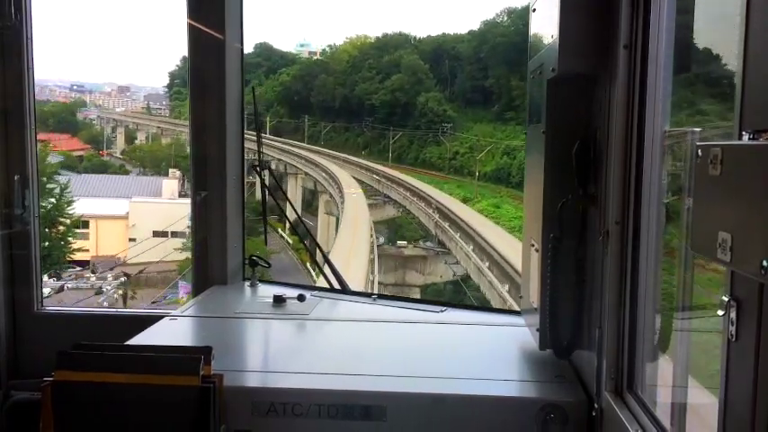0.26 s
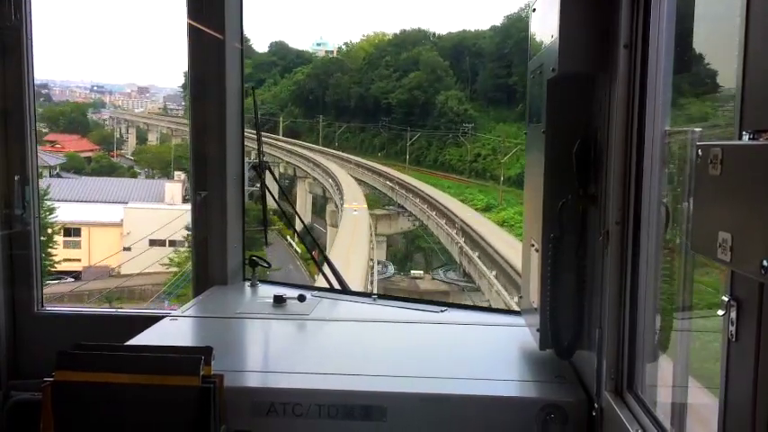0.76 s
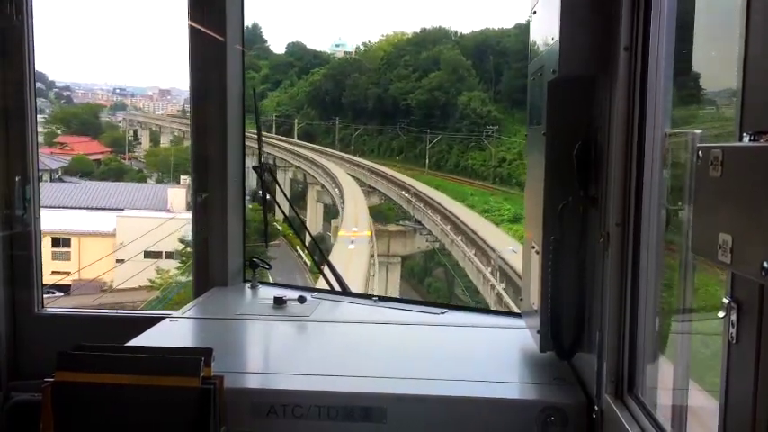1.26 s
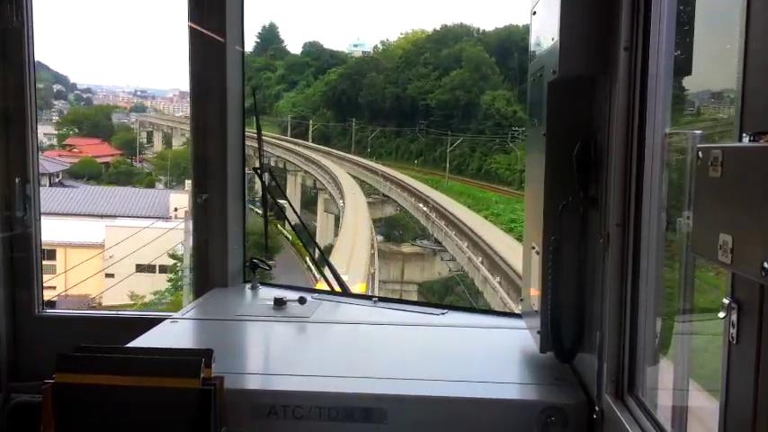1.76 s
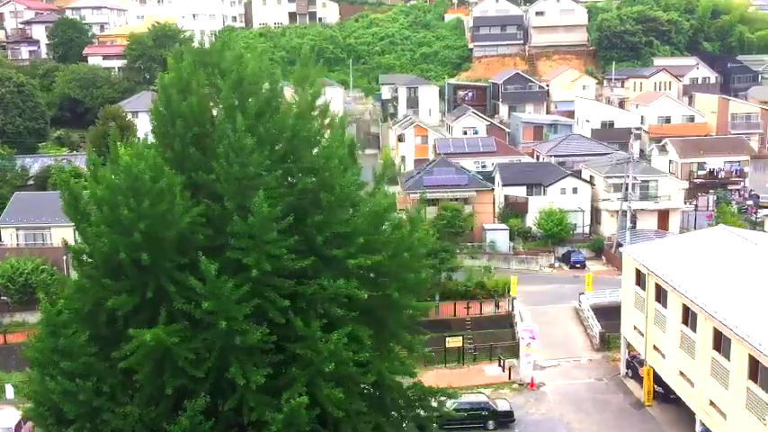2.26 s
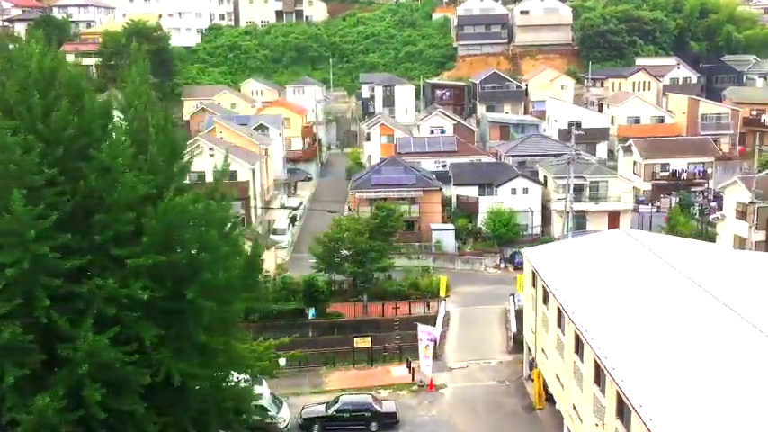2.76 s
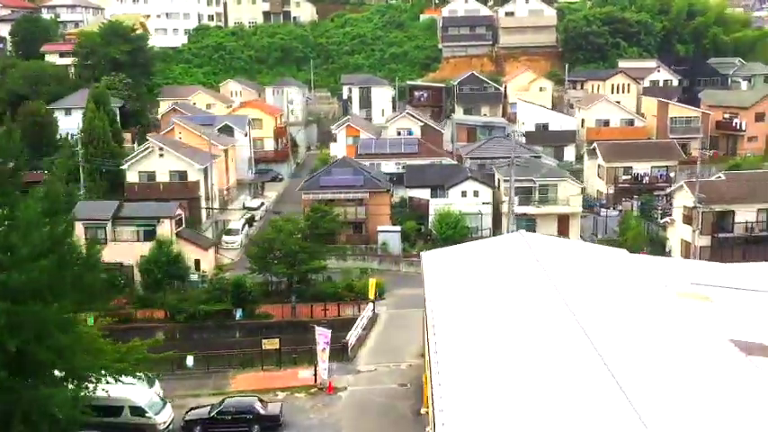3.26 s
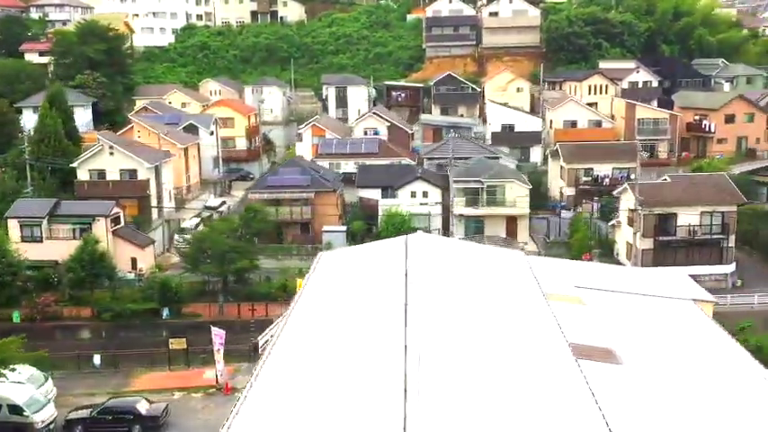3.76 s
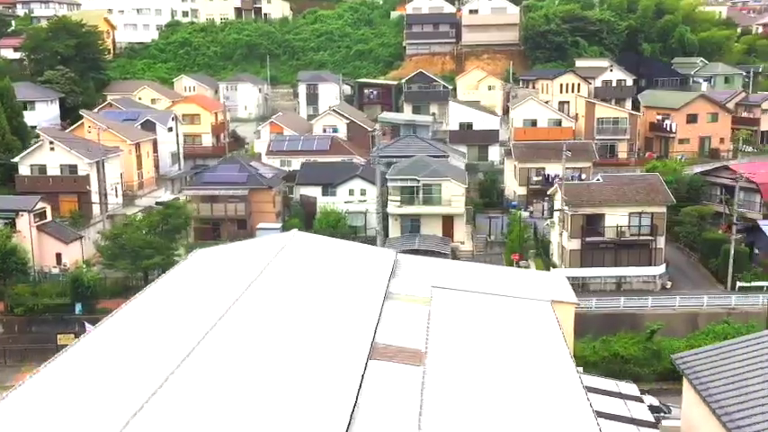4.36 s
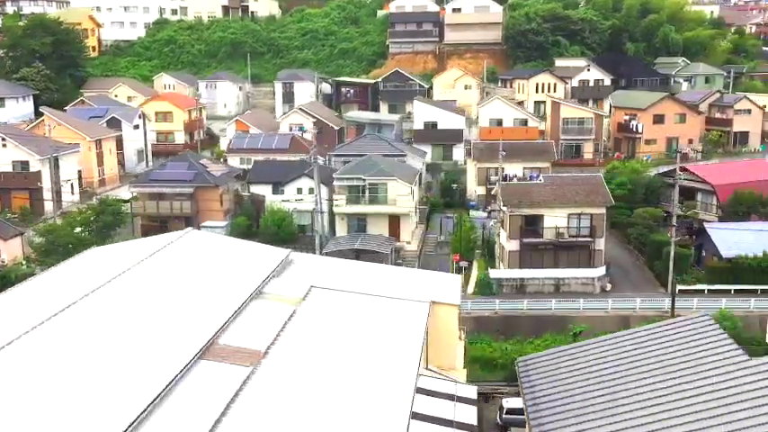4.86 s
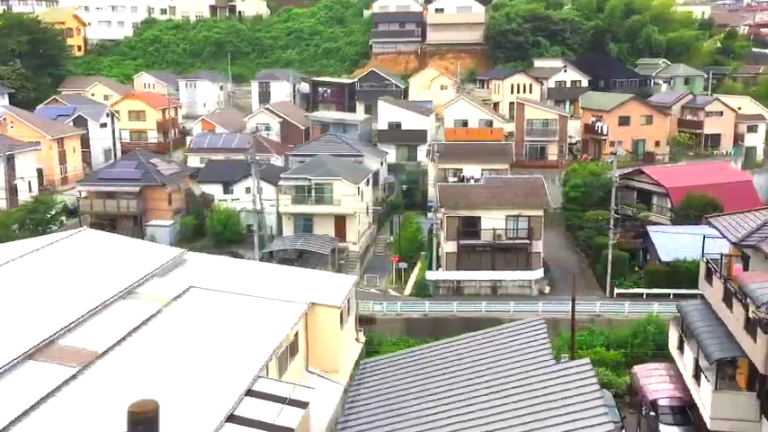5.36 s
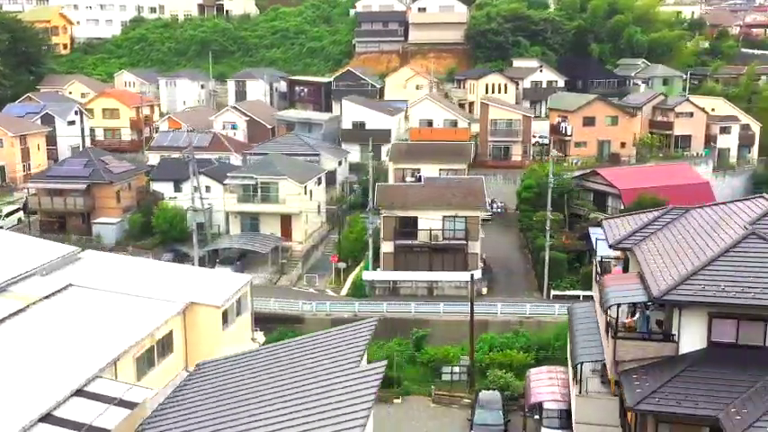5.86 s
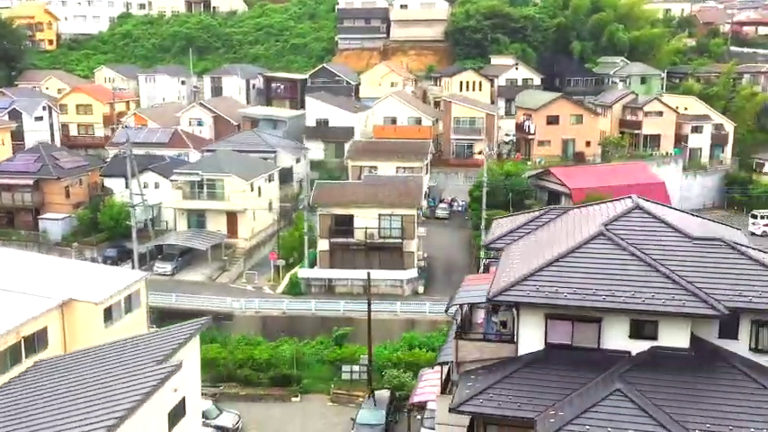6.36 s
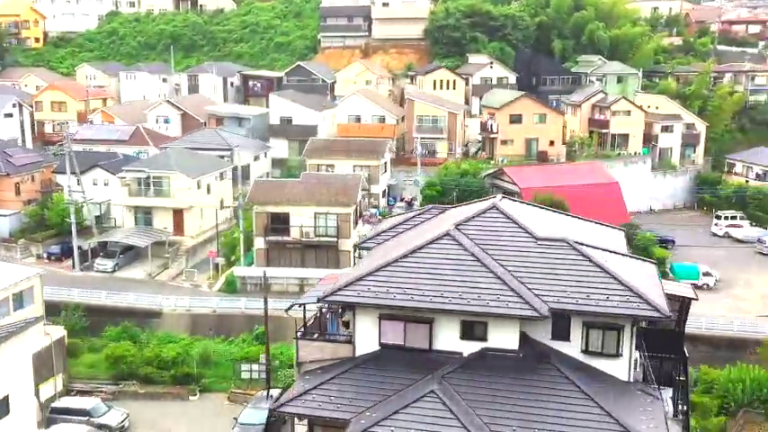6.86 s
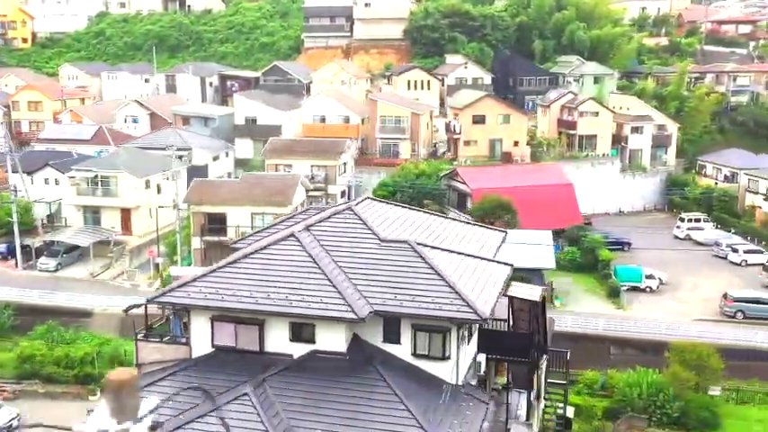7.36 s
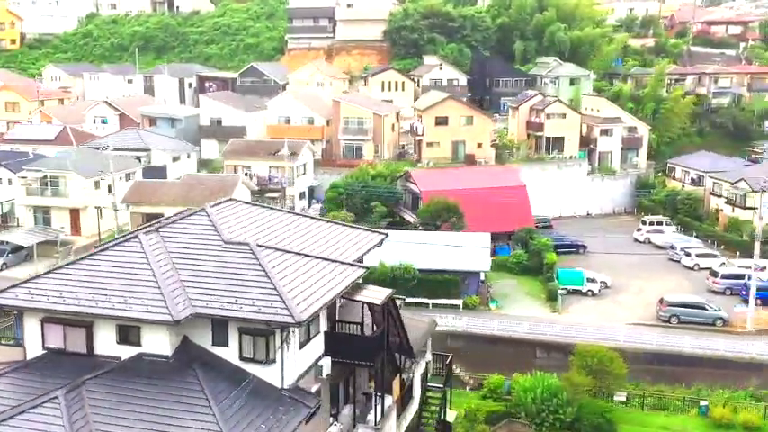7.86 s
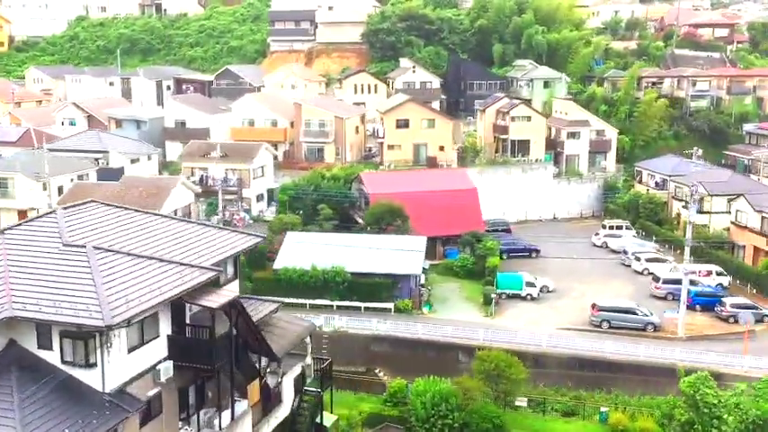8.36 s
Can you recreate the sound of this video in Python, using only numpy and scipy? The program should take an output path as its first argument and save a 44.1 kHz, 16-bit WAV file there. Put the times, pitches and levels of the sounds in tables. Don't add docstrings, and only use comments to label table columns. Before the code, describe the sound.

Heard from inside a monorail car: rubber tyres rolling on a concrete beam make a continuous deep boom that flutters in quick small surges. Wall panels hum in the low mids, air hisses softly past the windows, and a faint high gear whine comes and goes. Near the end the train slows slightly and everything eases. Stereo microphones in the cabin give centred bass and wide treble.

```python
import sys
import numpy as np
from scipy import signal
from scipy.fft import rfft, irfft, next_fast_len
from scipy.io import wavfile
from scipy.ndimage import uniform_filter1d

SR = 44100
rng = np.random.default_rng(int(sys.argv[2]) if len(sys.argv) > 2 else 0)


def gain_from_db(level_db):
    decades = np.asarray(level_db, float) / 20
    return 10 ** decades


def wav_out(sig):
    wavfile.write(sys.argv[1], SR, np.round(np.clip(np.atleast_2d(sig).T, -1, 1) * 32767).astype(np.int16))


N = 379701
SIZE = next_fast_len(N)
HZ = np.maximum(np.fft.rfftfreq(SIZE, 1 / SR), 1)
EARS = np.array([[1], [-1]])

# start_s, shaking_db, rush_db
RIDE = [(0.0, -0.5, 1.5), (0.5, 1, 1.5), (1.1, 0, 1), (1.6, -1, 0), (2.3, 1, -0.5), (2.7, -0.5, -.5),
        (3.2, 0, -1), (3.75, -0.5, -.5), (4.2, 0, -0.5), (5.0, 0.5, 0), (5.5, 0, 0), (6.2, -.5, 0),
        (6.7, -2, -1.5), (7.1, -3, -1), (7.6, -1.5, -1.5), (8.1, -3, -.5), (8.61, -5, -2)]


def along(table):
    s, *columns = np.transpose(table)
    return [np.interp(np.arange(N) / SR, s, c) for c in columns]


def across(table):
    hz, *columns = np.transpose(table)
    return [np.interp(np.log(HZ), np.log(hz), c) for c in columns]


def sound(spectra):
    return irfft(spectra, SIZE)[..., :N]


def walk(rate_hz):
    hold = int(SR / rate_hz)
    held = np.repeat(rng.standard_normal(N // hold + 1), hold)
    return 1.3 * uniform_filter1d(uniform_filter1d(held, hold), hold)[:N]


def swells(rows):
    t = np.arange(0, N / SR + .01, .01)
    rise = sum(rise_db * np.exp(-((t - s) / half_s) ** 2) for s, half_s, rise_db in rows)
    return np.interp(np.arange(N) / SR, t, rise)


def field(colour, lo_hz, hi_hz):
    # pitch_hz, likeness (0-1), left_lead_rad, left_minus_right_db
    pair = [(30, .97, .4, -3), (110, 1, .3, 1), (170, 1, 0, 0), (236, .95, .3, -2.2), (310, .9, .6, .8),
            (376, .84, .15, 3), (457, .96, .17, 1.4), (620, 0.76, 0, -2), (800, 0.94, 0.68, -1.5),
            (1150, 0.6, 1., 0.5), (1260, 0.4, 0.5, 4), (1530, 0.42, 0.5, 1), (2210, 0, 0.9, -5),
            (3250, 0, 0, -4.5), (3700, 0, 4, -7.5), (4470, 0.1, 3, 1), (6400, 0, 6.5, -4),
            (7500, 0.3, 5, -2.5), (8800, .05, 4.5, 2.5), (11200, .05, -0.5, -1), (15700, .05, 5, -2.5)]
    like, lead_rad, pan_db = across(pair)
    like = np.clip(like, 0, .999)
    mid = rfft(rng.standard_normal(SIZE))
    side = rfft(rng.standard_normal(SIZE))
    both = np.sqrt(1 + like) * mid + EARS * np.sqrt(1 - like) * side
    level_db = across(colour)[0] + EARS * pan_db / 2
    both = both * gain_from_db(level_db) * np.exp(.5j * EARS * lead_rad)
    inside = sound(both.mean(axis=0) * (HZ > lo_hz) * (HZ < hi_hz))
    return both / inside.std()


def even(x, span_s, share):
    span = int(span_s * SR)
    power = uniform_filter1d(uniform_filter1d(x.mean(axis=0) ** 2, span), span)
    return x * (power.mean() / (power + 1e-9)) ** (np.clip(share, 0, 1) / 2)


def flutter(spectra, lo_hz, count, flicker_db, rate_hz):
    place = np.clip(2 * np.log2(HZ / lo_hz), 0, count - 1)
    out = 0
    for k in range(count):
        band = np.clip(1 - abs(place - k), 0, 1)
        band_sound = sound((spectra * band).astype(np.complex64))
        out = out + gain_from_db(flicker_db * walk(rate_hz)) * band_sound
    return out


def shaken_floor():
    # pitch_hz, level_db (per Hz)
    colour = [(10, -40), (20, -18), (42, -10), (58, -9.5), (80, -3.5), (103, 1), (135, 0), (175, -3),
              (215, -9), (260, -12.5), (330, -24), (450, -71), (800, -140)]
    # middle_s, rise_db
    boom_patches = [(.08, 4.5), (.26, 3.5), (.7, -5), (.77, 3.5), (1.02, 6.5), (1.17, -5), (1.56, 5),
                    (1.71, 4.5), (1.94, -4), (2.31, 5.5), (2.5, -7), (2.95, 5.5), (3.73, -7.5), (4.21, -2),
                    (4.43, 3.5), (4.69, -2), (4.82, 5.5), (5.14, -4), (5.23, 1), (6.02, -5), (6.45, -6),
                    (6.73, 2.5), (7.07, -6), (7.55, 7), (7.64, -3.5), (7.77, 2), (7.86, -5), (8.44, -5)]
    # middle_s, rise_db
    drone_patches = [(.79, -4.5), (1.3, 4), (1.4, -6), (1.6, 5), (3.74, -5), (4.78, 0.5), (5.13, -4.5),
                     (5.34, -3.5), (5.66, 3), (5.83, -2), (6.47, 5), (6.87, 2), (7.06, -4.5), (7.28, -8),
                     (7.48, 4)]
    patch_s = 0.027
    sway_db, boom_db, drone_db = -41.5, -31, -32
    sway_follows = .6

    shake_db = along(RIDE)[0]
    boom_rise_db = swells([(s, patch_s, db) for s, db in boom_patches])
    drone_rise_db = swells([(s, patch_s, db) for s, db in drone_patches])

    above = np.clip((HZ - 55) / 30, 0, 1)
    top = np.clip((HZ - 120) / 40, 0, 1)
    sway = sound(field(colour, 20, 70) * np.sqrt(1 - above))
    boom = sound(field(colour, 70, 140) * np.sqrt(above - top))
    drone = sound(field(colour, 140, 280) * np.sqrt(top))

    out = gain_from_db(sway_db + sway_follows * shake_db) * even(sway, .3, 0.88)
    out = out + gain_from_db(boom_db + shake_db + boom_rise_db) * even(boom, .1, 0.54)
    return out + gain_from_db(drone_db + shake_db + drone_rise_db) * even(drone, .1, .6)


def panel_hum():
    # pitch_hz, level_db (per Hz)
    colour = [(200, -21), (290, -2.5), (360, -6.5), (400, -4), (450, 0), (500, -4), (590, -12.5),
              (680, -12.5), (760, -15), (830, -14.5), (950, -17.5), (1080, -22.5), (1400, -49),
              (2500, -140)]
    hum_db, hum_follows = -42, 0.22
    shake_db, rush_db = along(RIDE)
    hum = flutter(field(colour, 273, 1100), 300, count=5, flicker_db=0.0, rate_hz=9.9)
    return gain_from_db(rush_db + hum_db + hum_follows * shake_db) * even(hum, .15, .6)


def air_hiss():
    # pitch_hz, level_db (per Hz)
    colour = [(900, -20), (1150, 0), (1400, -1), (1640, 2), (1780, -1.5), (2750, -9.5), (3080, -12),
              (3650, -22), (4400, -18.5), (6000, -19.5), (7600, -26.5), (10000, -26.5), (12000, -34.5),
              (14000, -37.5), (15700, -42)]
    coarse_db, fine_db = -59.5, -57.5
    rush_db = along(RIDE)[1]
    air = field(colour, 1200, 2600)
    upper = np.clip((HZ - 3200) / 1000, 0, 1)
    coarse = flutter(air * (1 - upper), 800, count=4, flicker_db=0.72, rate_hz=6.3)
    fine = flutter(air * upper, 4000, count=5, flicker_db=.3, rate_hz=5.)
    return gain_from_db(rush_db) * (gain_from_db(coarse_db) * coarse + gain_from_db(fine_db) * fine)


def tone(turns, db, pan_db, lead_rad, blur, rate_hz):
    shared = walk(rate_hz) + 1j * walk(rate_hz)
    own = np.array([walk(rate_hz) + 1j * walk(rate_hz) for _ in range(2)])
    paths = (1 + blur * (shared + own)) / np.sqrt(1 + 4 * blur ** 2)
    place = gain_from_db(EARS * pan_db / 2) * np.exp(.5j * EARS * lead_rad)
    source = np.sqrt(2) * gain_from_db(db) * np.exp(2j * np.pi * turns)
    return np.real(place * paths * source)


def gear_whine():
    # start_s, mesh_hz
    speed = [(0.0, 2915), (0.7, 2922), (1.1, 2921), (1.7, 2914), (2.15, 2904), (2.8, 2906), (3.45, 2912),
             (4.3, 2905), (5.2, 2904), (6.1, 2906), (6.55, 2895), (7.25, 2881), (7.6, 2887), (8.05, 2907),
             (8.3, 2890), (8.61, 2862)]
    # middle_s, half_length_s, rise_db
    mesh_swells = [(0.13, .08, 5), (0.49, .08, 13), (1.2, .06, 4), (2.22, .09, 10), (2.52, .17, 9),
                   (3.45, .15, 2), (4.28, .13, 10), (4.9, .2, 3), (5.65, .08, 9), (5.95, .2, 8),
                   (6.2, .08, 6), (6.55, .17, 8), (6.88, .1, 7), (7.15, .12, 9), (7.8, .1, 7),
                   (8.6, .15, -4)]
    # middle_s, half_length_s, rise_db
    octave_swells = [(0.28, .06, 8), (0.75, .1, 9), (1.0, .15, 5), (1.4, .1, 5), (1.65, .1, 7),
                     (2.2, .1, 8), (2.7, .15, 4), (3.05, .05, 6), (3.6, .08, 6), (3.83, .13, 9),
                     (4.22, .05, 7), (4.43, .06, 8), (4.7, .06, 8), (5.02, .07, 9), (5.78, .1, 10),
                     (6.05, .12, 10), (6.35, .05, 5), (6.55, .08, 6), (6.85, .15, 4), (7.13, .07, 8),
                     (7.95, .15, 4), (8.6, .2, -6)]
    # middle_s, half_length_s, rise_db
    stage_swells = [
        (0.5, .5, 6),
        (2.45, .15, 7),
        (4.2, .25, 9),
        (4.85, .3, 11),
        (6.1, .25, 10),
        (7.0, .2, 6),
        (7.45, .15, 8),
    ]
    stage = 1.481
    rear = .992

    turns = np.cumsum(along(speed)[0]) / SR
    mesh_db = -75.5 + swells(mesh_swells)
    octave_db = -83.5 + swells(octave_swells)
    stage_db = -93.5 + swells(stage_swells)

    out = tone(turns, mesh_db, pan_db=-4, lead_rad=2., blur=.4, rate_hz=65.)
    out = out + tone(2 * turns, octave_db, pan_db=-3, lead_rad=5.4, blur=.4, rate_hz=60.)
    out = out + tone(3 * turns, -100, pan_db=2, lead_rad=1.2, blur=.6, rate_hz=3.)
    out = out + tone(rear * turns, -78, pan_db=-4, lead_rad=2., blur=3., rate_hz=70.)
    out = out + tone(2 * rear * turns, -86, pan_db=-3, lead_rad=5.4, blur=3., rate_hz=260.)
    out = out + tone(stage * turns, stage_db, pan_db=-1, lead_rad=1.3, blur=.1, rate_hz=4.)
    return out + tone((1 + stage) * turns, -95.5, pan_db=-6, lead_rad=1.5, blur=.2, rate_hz=4.)


def electrical_tones():
    # pitch_hz, level_db
    still = [
        (4099, -98),
        (15697, -111),
    ]
    t = np.arange(N) / SR
    return sum(tone(hz * t, db, pan_db=0, lead_rad=0, blur=.4, rate_hz=4.) for hz, db in still)


def scene():
    return shaken_floor() + panel_hum() + air_hiss() + gear_whine() + electrical_tones()


def low_pass(x):
    return signal.sosfilt(signal.butter(12, 15730, fs=SR, output="sos"), x)


def record(dry):
    rounded = np.tanh(1.51 * dry) / 1.496
    return low_pass(rounded)


dry = scene()
out = record(dry)
wav_out(out)
```